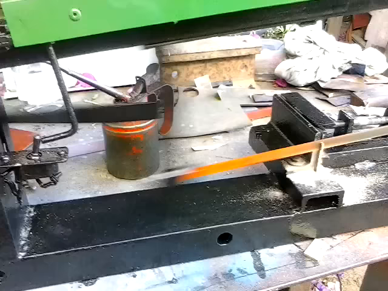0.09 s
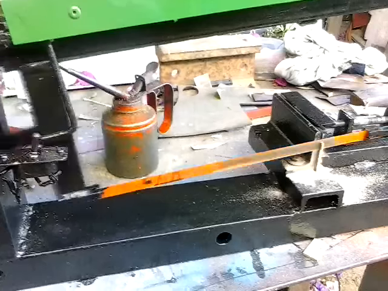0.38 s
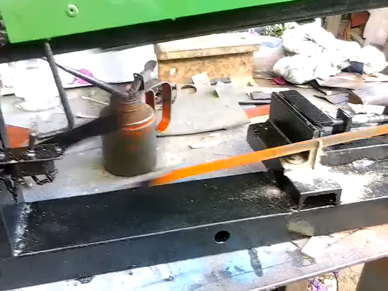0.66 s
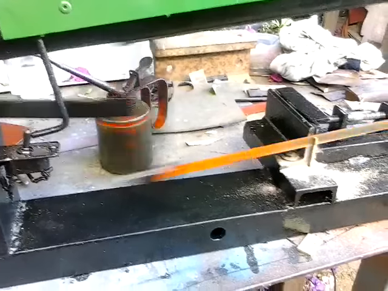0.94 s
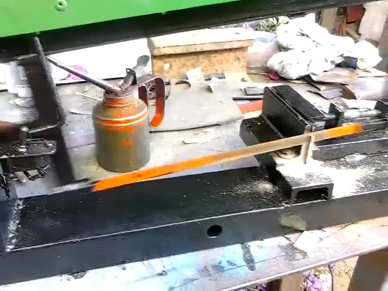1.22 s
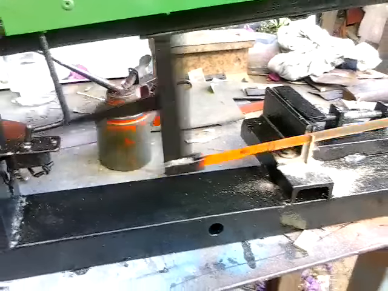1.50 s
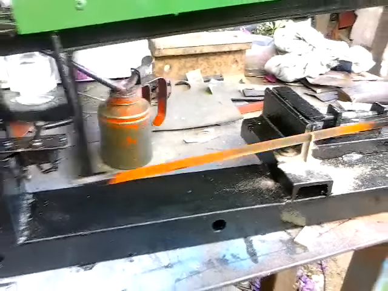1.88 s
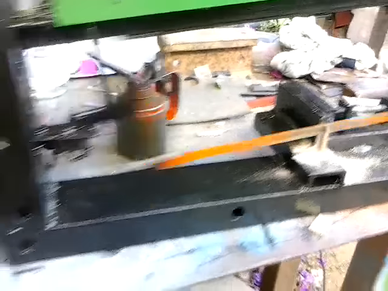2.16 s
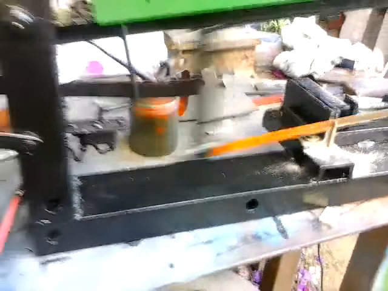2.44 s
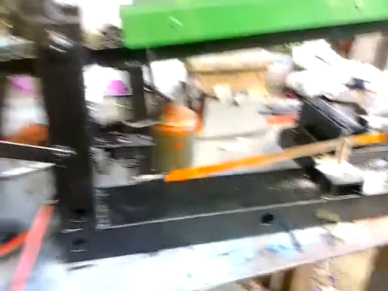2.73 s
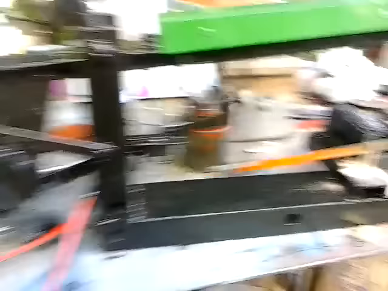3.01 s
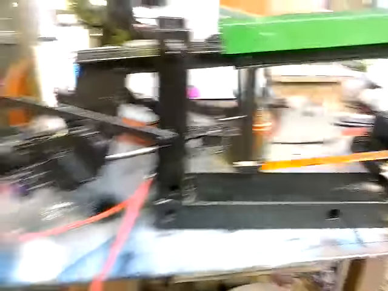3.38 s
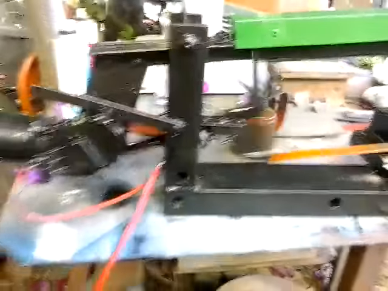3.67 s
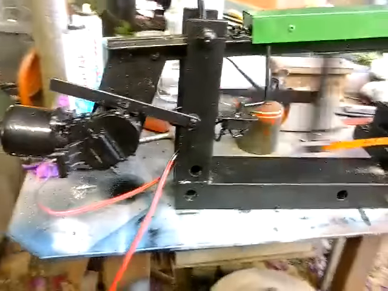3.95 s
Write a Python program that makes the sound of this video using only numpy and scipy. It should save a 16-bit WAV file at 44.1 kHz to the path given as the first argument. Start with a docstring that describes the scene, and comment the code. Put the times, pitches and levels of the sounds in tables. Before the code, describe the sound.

A motor-driven hacksaw works close by in an even rhythm: a knock and a squeaky, groaning scrape, then a louder, gritty rasp that rings the steel frame. This repeats five times while a faint hum swells with each cut.

```python
"""A motor's hum comes first, then a knock and a scrape: a crank drives a hacksaw on a nearby workbench,
about 77 strokes a minute. On each return the blade scrapes, clacks, groans and squeaks by friction;
on each cut the teeth rasp and excite the resonances of the steel frame. The blade catches at the same
places on every pass, play in the linkage knocks at each reversal, and the hum swells under the load."""
import sys
import numpy as np
from scipy import signal
from scipy.fft import rfft, irfft
from scipy.io import wavfile
from scipy.ndimage import uniform_filter1d, minimum_filter1d

SR = 44100
rng = np.random.default_rng(int(sys.argv[2]) if len(sys.argv) > 2 else 0)


def wav_out(sig):
    """Save sig, one row per channel (or a flat mono array), as 16-bit PCM at SR to the path in sys.argv[1]."""
    wavfile.write(sys.argv[1], SR, np.round(np.clip(np.atleast_2d(sig).T, -1, 1) * 32767).astype(np.int16))


N = 176400

def undb(db):
    return 10 ** (np.asarray(db) / 20)

def level(x, db):
    """Scale to an RMS level; levels within x remain only relative."""
    return x * undb(db) / np.sqrt(np.mean(x ** 2))

def clock():
    return np.arange(N) / SR

def bell(t, centre, sigma):
    return np.exp(-.5 * ((t - centre) / sigma) ** 2)

def walk(rate):
    """Low-pass random fluctuation with a spread near 1."""
    k = int(SR / rate)
    steps = np.repeat(rng.standard_normal(N // k + 1), k)
    return 1.33 * uniform_filter1d(uniform_filter1d(steps, k), k)[:N]

def per_bin(points):
    """Interpolation of (frequency, value) rows on a logarithmic frequency axis."""
    hz, value = np.array(points, float).T
    return np.interp(np.log(np.fft.rfftfreq(N, 1 / SR) + 1), np.log(hz), value)

def colour(x, points, modes=()):
    """Minimum-phase filter: a broad spectral envelope plus resonance peaks."""
    f = np.fft.rfftfreq(N, 1 / SR)
    db = per_bin(points) + sum(lift / (1 + (2 * (f - hz) / width) ** 2) for hz, width, lift in modes)
    cepstrum = irfft(np.log(undb(db)), N)
    cepstrum[1:N // 2] *= 2
    cepstrum[N // 2 + 1:] = 0
    return irfft(rfft(x) * np.exp(rfft(cepstrum)), N)

def grit(rate, spread_db, smooth):
    """Shot noise: random impulses of uneven size over Gaussian friction noise."""
    clicks = (rng.random(N) < rate / SR) * rng.choice([-1, 1], N)
    sizes = undb(spread_db * rng.standard_normal(N))
    return level(clicks * sizes, 0) + smooth * rng.standard_normal(N)

def stroke(start, length, power, catches=()):
    """Sliding friction follows the crank's half sine of speed and jumps where the blade catches."""
    u = clock() - start
    inside = (u > 0) & (u < length)
    u, out = u[inside], np.zeros(N)
    boost_db = sum(db * bell(u, at, sigma) for at, sigma, db in catches)
    out[inside] = np.sin(np.pi * u / length) ** power * undb(boost_db)
    return out

def strikes(rows, click):
    """Impact excitation: an impulse of size click on a unit burst of exponentially decaying noise."""
    u, out = clock()[:4000], np.zeros(N)
    for s, db, decay in rows:
        first = int(s * SR)
        blow = np.exp(-u / decay) * rng.choice([-1, 1], len(u)) + click * (u == 0)
        out[first:first + len(u)] += undb(db) * blow[:N - first]
    return out

HUM_HZ, ROTOR_HZ = 100.1, 159.8
# Spectrum of the running drive (frequency [Hz], gain [dB])
DRIVE_SPECTRUM = [(20, -42), (44, -10.5), (98, 1), (462, -11), (600, -5.5), (1180, -15.5), (3600, -10),
                  (5570, -19), (6370, -17), (8000, -31), (15000, -20)]
def motor():
    """Mechanical loading: late in each cut the mains hum swells and the rotor slows, over steady noise."""
    t = clock()
    load = sum(undb(scrape_db) * bell(t, s + 0.263, 0.088) for s, _, _, scrape_db, *_ in CUTS)
    hum = np.sin(2 * np.pi * HUM_HZ * t) * undb(8.5 * load + 0.73 * walk(9.85))
    rotor_hz = ROTOR_HZ * (1 - 0.0547 * load + 0.013 * walk(24.7))
    rotor = np.sin(2 * np.pi * np.cumsum(rotor_hz) / SR) * undb(-6 * load + 3.6 * walk(22.02))
    drive = colour(grit(rate=1600, spread_db=1, smooth=0.71), DRIVE_SPECTRUM)
    return level(hum, -40.5) + level(rotor, -48) + level(drive, -39)

# Modes of the steel frame, shared by impacts and scrapes (frequency [Hz], bandwidth [Hz], gain [dB])
FRAME_MODES = [(581, 38, 4.5), (662.7, 38, 13), (1602, 116, 6.5), (1850, 130, 8), (2037, 18.6, 11.5),
               (2797, 47, 9.5), (3185, 25, 9), (3434, 42, 9), (3733, 108, 9), (4069, 49, 9),
               (4240, 53, 8.5), (4720, 150, 9), (5150, 110, 9.5), (6314, 360, 8), (11010, 1170, 9)]
# Knocks at the reversals (time [s], level [dB])
KNOCKS = [(0.135, -21.5), (0.475, -30), (0.917, -22.5), (1.253, -31), (1.688, -24.5), (2.034, -34),
          (2.468, -26.5), (2.818, -33), (3.251, -26), (3.6, -34)]
# Spectrum of a knock (frequency [Hz], gain [dB])
KNOCK_SPECTRUM = [(40, -7.5), (100, 9.5), (170, -2.5), (300, 1), (650, 1.5), (1000, -0.5), (2000, -13),
                  (4000, -5.5), (12000, -32)]
def linkage(rise_s=0.0035, decay_s=0.012):
    """Backlash: the joints clatter at each reversal, and the bench thumps as the load comes on."""
    t = clock()
    blows = sum(undb(db) * np.exp(-np.maximum(s - t, 0) / rise_s - np.maximum(t - s, 0) / decay_s)
                for s, db in KNOCKS)
    knocks = colour(blows * grit(rate=2600, spread_db=-5, smooth=0.75), KNOCK_SPECTRUM, FRAME_MODES)
    take_up = sum(bell(t, s + 0.022, 0.0107) for s, *_ in CUTS)
    bench_spectrum = [(40, -13), (100, 8), (200, 1.5), (700, -26.5), (2000, -16), (6000, -53)]
    thumps = colour(take_up * rng.standard_normal(N), bench_spectrum, FRAME_MODES)
    return level(knocks, -43) + level(thumps, -51.5)

# Return strokes (start [s], duration [s], scrape [dB], groan [dB], squeak [dB])
RETURNS = [(0.134, 0.3, 0, 1, 4), (0.915, 0.3, 0, 1, 2.5), (1.69, 0.33, 0, 1, -0.5),
           (2.47, 0.31, -0.5, -2, -0.5), (3.251, 0.35, -1.5, -6.5, -2)]
# Catches on each return (time in stroke [s], half-width [s], gain [dB])
RETURN_CATCHES = [(0.002, 0.017, 26), (0.072, 0.021, 10.5), (0.132, 0.0071, 13), (0.18, 0.011, 15),
                  (0.219, 0.013, 10.5), (0.258, 0.011, 11.5)]
# Spectrum of the bright scrape (frequency [Hz], gain [dB])
RETURN_SPECTRUM = [(1200, -21), (2400, -0.5), (3100, 6), (3700, -1), (4250, 2), (5100, -1.5), (5800, 5),
                   (6600, 1), (8800, -11.5), (10300, -22.5), (12700, -7), (14200, -23), (15200, -52)]
# Spectrum of the frame's rattle (frequency [Hz], gain [dB])
RATTLE_SPECTRUM = [(100, -26.5), (270, -1), (450, -3), (620, 2), (800, 4), (1020, 1.5), (1300, 2.5),
                   (1430, -0.5), (1900, 0.5), (2300, -1), (3000, -2.5), (5000, -9)]
def return_scrape():
    """Sliding friction: the unloaded blade skips back, and the frame's rattle dies along the stroke."""
    t = clock()
    force = sum(undb(db) * stroke(s, length, 0.44, RETURN_CATCHES) for s, length, db, *_ in RETURNS)
    friction = force * undb(0.88 * walk(400)) * grit(rate=1600, spread_db=3.5, smooth=0.33)
    scrape = colour(friction, RETURN_SPECTRUM, FRAME_MODES)
    shake = sum(undb(db) * bell(t, s + 0.072, 0.096) * stroke(s, length, 0.74, RETURN_CATCHES) ** 0.57
                for s, length, db, *_ in RETURNS)
    rattle = colour(shake * grit(rate=1100, spread_db=1.5, smooth=0.34), RATTLE_SPECTRUM, FRAME_MODES)
    return level(scrape, -36) + level(rattle, -36.5)

# Impacts of the returning blade (time [s], level [dB], decay time [s])
CLACKS = [(0.147, -8, 0.01), (0.306, -10.5, .008), (0.927, -5.5, .006), (0.987, -8.5, 0.0082),
          (1.087, -5.5, 0.0065), (1.702, -9.5, 0.012), (1.768, -11, .004), (1.865, -10, 0.0045),
          (2.645, -8, 0.0039), (2.734, -17, 0.0072), (3.427, -21, 0.0046)]
def clacks():
    """Impulse response: the blade jumps in its slot and the frame rings."""
    spectrum = [(1500, -4), (3200, -4), (4300, 11), (5500, -0.5), (6600, 7.5), (8000, -2.5),
                (14000, -30.5)]
    return level(colour(strikes(CLACKS, click=2.5), spectrum, FRAME_MODES), -38.5)

# Swells of the groan (time in stroke [s], half-width [s], frequency [Hz], glide [Hz/s], level [dB])
GROANS = [(0.026, 0.014, 640, 1497, -12), (0.063, .012, 585, 1496, -2), (0.117, 0.013, 587, 1303, 1),
          (0.162, 0.011, 598, -600, -5), (0.185, .007, 615, 998, -6.5), (0.227, 0.013, 615, -600, -12.5),
          (0.267, 0.012, 578, -200, -6.5), (0.329, 0.012, 582, -5, -18)]
# Spectrum of the growl (frequency [Hz], gain [dB])
GROWL_SPECTRUM = [(400, -34.5), (480, -25), (530, -2), (590, 8.5), (680, -6.5), (780, -1), (900, -20.5),
                  (1500, -49.5)]
def groan(shudder_hz=105.6, shudder_depth=0.18):
    """Stick-slip oscillation near the blade's bending note: gliding, shuddering swells over a growl."""
    t, tone = clock(), np.zeros(N)
    for at, sigma, hz, glide, db in GROANS:
        waver = 1 + 0.03 * walk(250)
        for s, _, _, stroke_db, _ in RETURNS:
            near = abs(t - s - at) < .08
            u = t[near] - s - at
            phase = 2 * np.pi * (np.cumsum((hz + glide * u) * waver[near]) / SR + rng.random())
            tone[near] += undb(db + stroke_db) * bell(u, 0, sigma) * np.sin(phase)
    shudder = 1 + shudder_depth * np.sin(2 * np.pi * np.cumsum(shudder_hz * (1 + .2 * walk(60))) / SR)
    effort = sum(undb(db) * stroke(s, length, 0.89) for s, length, _, db, _ in RETURNS)
    growl = colour(effort * rng.standard_normal(N), GROWL_SPECTRUM)
    return level(tone * shudder * undb(0.53 * walk(120)), -35.5) + level(growl, -39)

# Return squeaks (time in stroke [s], half-width [s], frequency [Hz], bandwidth [Hz], level [dB])
SQUEAKS = [(0.07, 0.0056, 1820, 170, -1.5), (0.079, 0.0065, 1050, 297, 3.5), (0.132, 0.021, 2880, 900, 1.5),
           (0.266, 0.023, 3370, 600, -0.5)]
def squeaks():
    """Band-limited friction noise: the blade briefly rubs the side of its slot."""
    t, out = clock(), 0
    for at, sigma, hz, width, db in SQUEAKS:
        band = signal.butter(2, [hz - width / 2, hz + width / 2], "bandpass", fs=SR, output="sos")
        rub = sum(undb(stroke_db) * bell(t, s + at, sigma) for s, *_, stroke_db in RETURNS)
        out += rub * level(signal.sosfilt(band, rng.standard_normal(N)), db)
    return level(out, -41.5)

# Cutting strokes (start [s], duration [s], rasp [dB], scrape [dB], blade ring [dB], upper rasp [dB])
CUTS = [(0.469, 0.4, -2, -1, 3.5, 7), (1.25, 0.4, -0.5, -0.5, 2.5, 5), (2.03, 0.4, -1.5, -1, 8, 2.5),
        (2.81, 0.39, -1, -1, 9, 1.5), (3.598, 0.39, 1, -4, 10, -3.5)]
# Catches on each cut (time in stroke [s], half-width [s], gain [dB])
CUT_CATCHES = [(0.036, 0.016, 12.5), (0.094, 0.017, 10), (0.15, 0.014, 11.5), (0.196, 0.012, 5.5),
               (.227, .015, 12.5), (0.303, 0.022, 10), (0.341, 0.011, 4)]
# Spectrum of the rasp (frequency [Hz], gain [dB])
RASP_SPECTRUM = [(1500, -31.5), (2400, -17.5), (2900, -10.5), (3900, -7), (4500, -0.5), (5000, -8),
                 (5500, -12.5), (6600, -7.5), (7200, -17.5), (8100, -13), (8700, -24.5), (13500, -26.5),
                 (15200, -41)]
def rasp(stall_db=-6, stall_s=0.004):
    """Forced vibration: tearing chips drive the frame and blade, which stalls just before each snag."""
    t, out = clock(), 0
    stall = undb(stall_db * sum(bell(t, s - stall_s, stall_s) for s, *_ in SNAGS))
    chatter = undb(2.8 * walk(520) + 1.45 * walk(120))
    chips = stall * chatter * grit(rate=2400, spread_db=1.5, smooth=0.76)
    for s, length, db, _, ring_db, upper_db in CUTS:
        blade_ring, upper_rasp, chip_fizz = (3740, 340, ring_db), (5100, 4500, upper_db), (10500, 650, 2)
        modes = FRAME_MODES + [blade_ring, upper_rasp, chip_fizz]
        out += undb(db) * colour(chips * stroke(s, length, 0.97, CUT_CATCHES), RASP_SPECTRUM, modes)
    return level(out, -25)

# Spectrum of the low scrape (frequency [Hz], gain [dB])
CUT_SPECTRUM = [(80, -14), (250, -3), (460, -10), (560, 6.5), (700, -3.5), (950, -7.5), (1400, -4.5),
                (1800, -7), (2600, -1), (3600, -10.5), (8000, -28.5)]
def cut_scrape():
    """Friction under load: a low scrape swells as the blade bites and drops as it eases off."""
    t, force = clock(), 0
    for s, length, _, db, *_ in CUTS:
        bite_db = 7.6 * bell(t, s + 0.031, 0.015) + 6.1 * bell(t, s + 0.24, 0.068)
        ease_db = -3.5 * bell(t, s + 0.374, 0.014)
        force += undb(db + bite_db + ease_db) * stroke(s, length, 0.2)
    friction = force * undb(2.95 * walk(70)) * grit(rate=2000, spread_db=3.5, smooth=1.0)
    return level(colour(friction, CUT_SPECTRUM, FRAME_MODES), -36)

def grunt(start_hz=322.3, fall_hz_per_s=3000):
    """Loading transient: the bench groans as each cut begins, in a short, rough, falling note."""
    t, out = clock(), 0
    for s, *_ in CUTS:
        hz = np.clip(start_hz - fall_hz_per_s * (t - s), HUM_HZ, start_hz) * (1 + 0.089 * walk(300))
        out += bell(t, s + 0.023, 0.021) * np.sin(2 * np.pi * np.cumsum(hz) / SR)
    return level(out, -54.5)

# Teeth passing the work (time in stroke [s], rate [Hz], level [dB])
TOOTH_PASSAGE = [(.05, 560, -36), (.09, 670, -1.5), (.13, 830, -13.5), (.21, 1100, -5.5), (.24, 1190, 1),
                 (.266, 1290, 3), (0.284, 1250, -11), (.3, 800, -10), (.38, 255, -16)]
def teeth():
    """Periodic excitation: the tooth-passing frequency rises and falls with the blade's speed."""
    t, out = clock(), 0
    at, hz, db = np.array(TOOTH_PASSAGE).T
    for s, length, *_ in CUTS:
        uneven = 1 + .1 * walk(1200)
        phase = 2 * np.pi * np.cumsum(np.interp(t - s, at, hz) * uneven) / SR
        envelope = (t > s) * (t < s + length) * undb(np.interp(t - s, at, db))
        out += envelope * (np.sin(phase) + 0.2 * np.sin(2 * phase))
    rough = out * undb(3.5 * walk(250))
    return level(colour(rough, [(200, 6), (600, 2.5), (3000, -1.5)], FRAME_MODES), -41.5)

# Snags of single teeth (time [s], level [dB], decay time [s])
SNAGS = [(0.577, -5, .002), (0.615, -13, 0.0074), (0.660, -10, 0.0023), (0.700, -9, 0.0048),
         (0.760, -14, 0.0025), (1.337, -11, 0.0055), (1.395, -7, 0.0037), (1.482, -5, 0.0053),
         (2.115, -10.5, 0.0066), (2.176, -2, 0.0017), (2.257, -13, .003), (2.321, -14, 0.0065),
         (2.956, -9, 0.0017), (3.003, -10, 0.0022), (3.043, -5, 0.0024), (3.635, -10, 0.0076),
         (3.677, -11, 0.0083), (3.724, -14, 0.0037), (3.821, -14, 0.0022), (3.901, -8, 0.0034),
         (3.914, -11.5, 0.0044)]
# Spectrum of a snag (frequency [Hz], gain [dB])
SNAG_SPECTRUM = [(1500, -35.5), (3200, -16.5), (3900, 2.5), (4600, -1), (5200, -7.5), (6600, -12.5),
                 (9000, -36.5)]
def snags():
    """Sudden release: a caught tooth snaps free and excites the frame's modes."""
    return level(colour(strikes(SNAGS, click=2), SNAG_SPECTRUM, FRAME_MODES), -34.5)

# Thin chirp of the blade (time [s], half-width [s], frequency [Hz], level [dB])
CHIRPS = [(2.685, .003, 6270, -23)]
def chirp():
    """Friction-excited tone: the blade's edge rubs and sings for an instant."""
    t = clock()
    waver = 1 + 0.0058 * walk(400)
    return sum(undb(db) * bell(t, s, sigma) * np.sin(2 * np.pi * np.cumsum(hz * waver) / SR)
               for s, sigma, hz, db in CHIRPS)

# Phase lead of left over right (frequency [Hz], phase [rad])
LEFT_LEAD = [(60, -.15), (250, -.25), (600, -.36), (1000, -.3), (1500, .35), (3500, -.5), (4800, -1.8),
             (6400, -2.3), (8300, -2.6), (15000, -3.1)]
# Nearby reflections (frequency [Hz], level [dB])
REFLECTIONS = [(100, -30), (650, -24), (1300, -11), (3000, -8), (5000, -9), (12000, -6)]
# Incoherent share of the left channel, from other parts of the saw (frequency [Hz], level [dB])
INCOHERENT_SHARE = [(40, -14), (100, -37), (600, -24), (1200, -4.5), (3000, -4.5), (5000, -5.5),
                    (12000, -4)]
def place(source, balance, t60_s=0.077):
    """Interaural level and phase differences set the saw to the right, among short reflections."""
    t = clock()
    tail = rng.standard_normal((2, N)) * undb(-60 * t / t60_s) * (t > .001)
    tail /= np.sqrt(np.sum(tail ** 2, axis=1, keepdims=True))
    near, other = rfft(source()), rfft(source())  # two independent draws
    share = np.clip(undb(per_bin(INCOHERENT_SHARE)), 0, 1)
    heard = np.array([near * np.sqrt(1 - share ** 2) + other * share, near])
    sides = np.array([[.5], [-.5]])
    paths = np.exp(1j * sides * per_bin(LEFT_LEAD)) + rfft(tail) * undb(per_bin(REFLECTIONS))
    return irfft(heard * paths * undb(sides * per_bin(balance)), N)

# Left minus right for the cutting sounds (frequency [Hz], level difference [dB])
CUT_BALANCE = [(60, -7), (110, 2), (200, -1.5), (380, 2.5), (700, -1), (1290, -3), (2380, -0.5),
               (4400, -12.5), (8120, -3), (15000, 0)]
# Left minus right for the return, linkage and motor (frequency [Hz], level difference [dB])
RETURN_BALANCE = [(60, -9.5), (110, 1), (200, -1), (380, 1), (700, -0.5), (1290, -4), (2380, -0.5),
                  (4400, -9), (8120, -4.5), (15000, 0.5)]
def scene():
    """Superposition of two groups of sources, each with its own stereo balance."""
    cut = place(lambda: rasp() + cut_scrape() + snags() + teeth() + grunt(), CUT_BALANCE)
    rest = place(lambda: return_scrape() + clacks() + squeaks() + chirp() + groan() + linkage() + motor(),
                 RETURN_BALANCE)
    return cut + rest

def record(dry, start_s=0.077, ceiling=0.95, limiter_s=0.002, cutoff_hz=15200):
    """Peak and band limiting: after a quick fade-in, a limiter holds the peaks and the top is cut."""
    x = dry * np.clip((clock() - start_s) / 0.0072, 0, 1)
    size = int(limiter_s * SR)
    needed_gain = ceiling / np.maximum(abs(x).max(axis=0), ceiling)
    gain = uniform_filter1d(minimum_filter1d(needed_gain, 2 * size), size)
    return signal.sosfilt(signal.ellip(10, .2, 80, cutoff_hz, fs=SR, output="sos"), x * gain)

dry = scene()
out = record(dry)
wav_out(out)
```